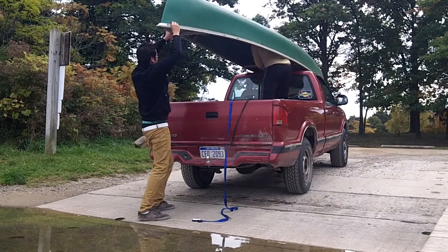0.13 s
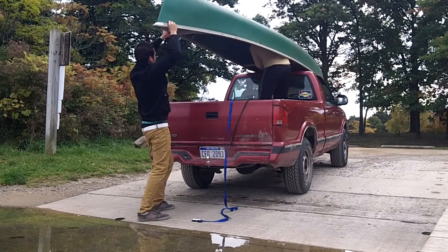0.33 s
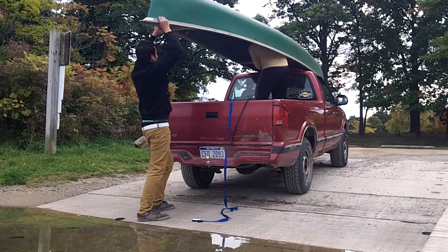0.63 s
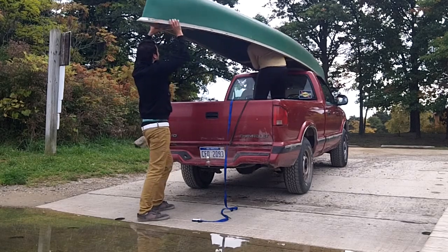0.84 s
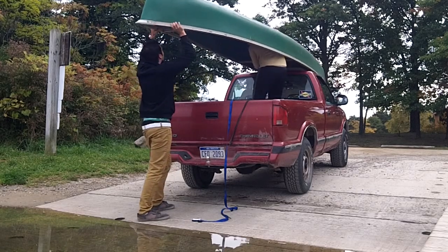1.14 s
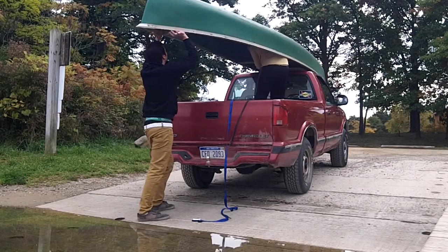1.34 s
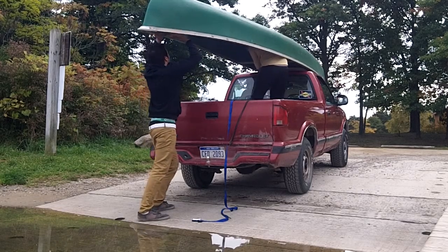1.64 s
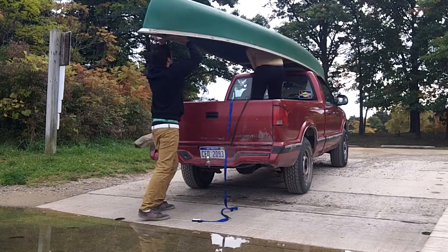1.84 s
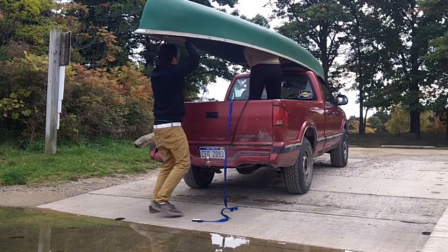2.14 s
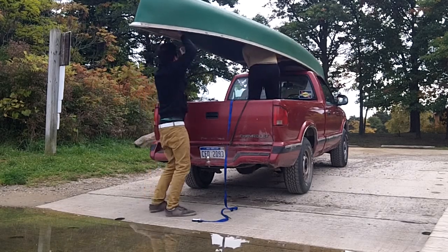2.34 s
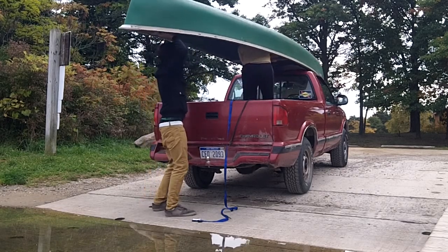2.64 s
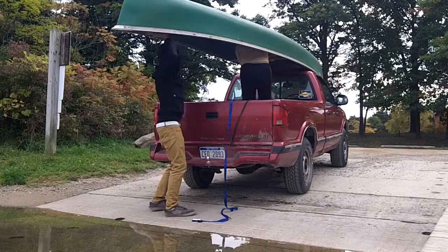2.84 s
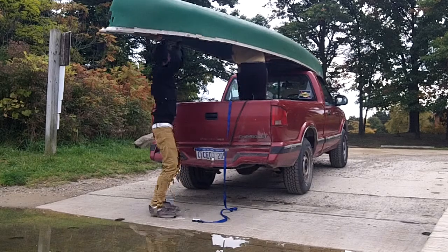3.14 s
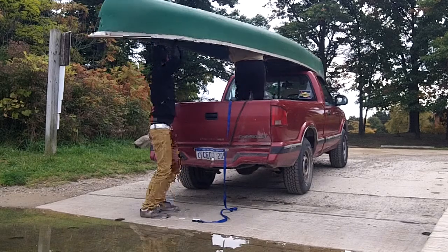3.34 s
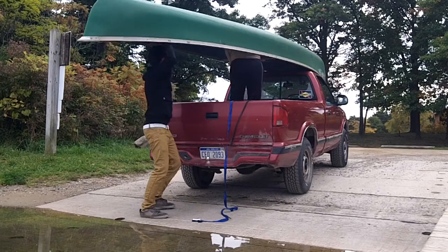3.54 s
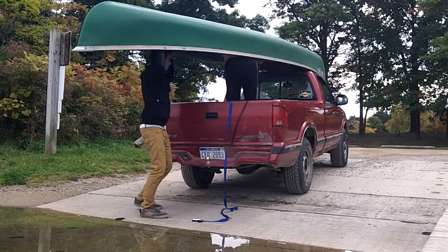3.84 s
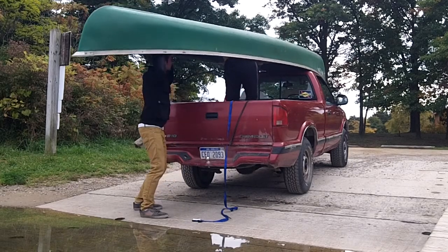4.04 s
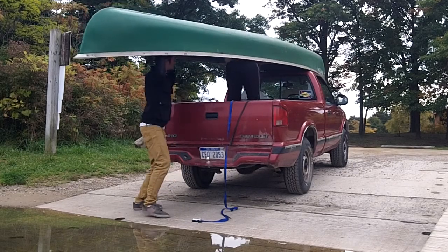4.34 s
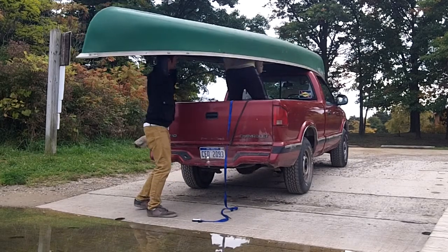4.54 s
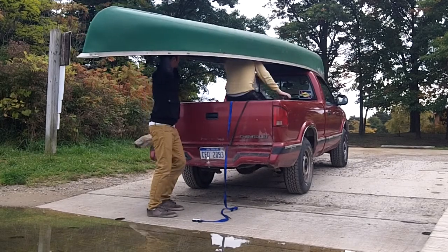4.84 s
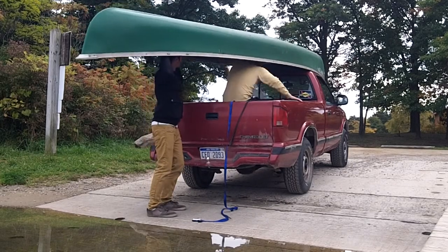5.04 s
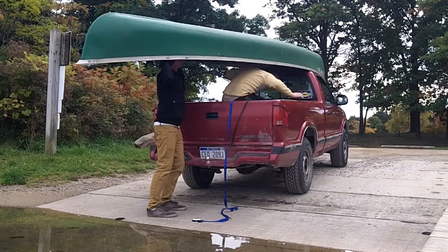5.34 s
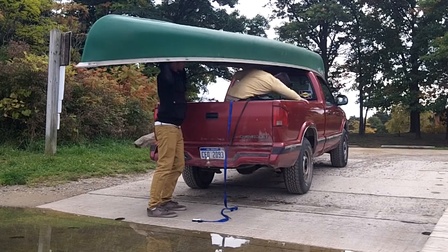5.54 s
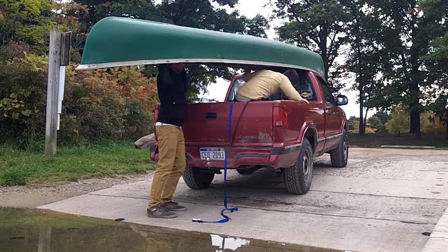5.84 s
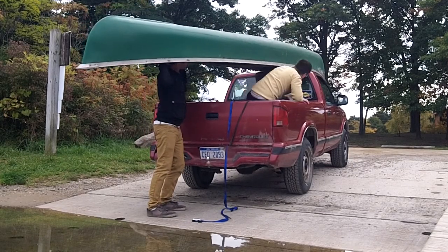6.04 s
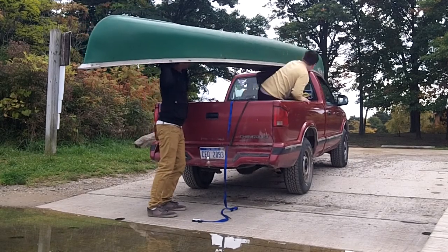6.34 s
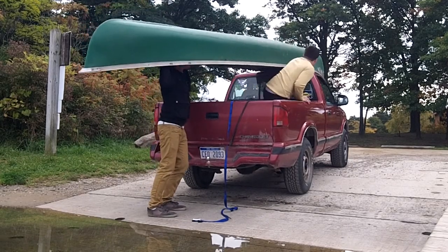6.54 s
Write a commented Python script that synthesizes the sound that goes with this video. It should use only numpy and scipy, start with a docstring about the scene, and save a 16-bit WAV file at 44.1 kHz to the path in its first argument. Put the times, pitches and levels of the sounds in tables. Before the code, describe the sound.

Outdoors, a bird repeats a short nasal squeaky call while a canoe bumps hollowly onto a truck, with soft footfalls and faint distant squawks.

```python
"""Boat launch ringed by trees, one microphone channel: a canoe is slid onto a pickup.
Under it lie a low rumble of chance level, an open-air wash and a fine hiss, all shaped noise.
Far off, hoarse squawks glide on rough harmonics; nearer, a bird repeats a nasal call of partials that frays.
Closest is the work: ringing hull modes, ticks, friction of tiny slips, shoe thuds, gritty scuffs and rustles.
Echoes and a diffuse tail of noise put the birds among the trees; the work has the tail alone."""
import sys
import numpy as np
from scipy import signal
from scipy.fft import rfft, irfft
from scipy.io import wavfile

SR = 44100
rng = np.random.default_rng(int(sys.argv[2]) if len(sys.argv) > 2 else 0)


def put_to_file(sound):
    """Save the sound as 16-bit audio at rate SR, in the file named by the first command-line argument."""
    columns = np.atleast_2d(sound).T  # one column per channel
    safe = np.clip(columns, -1, 1)
    whole_steps = np.round(safe * 32767)
    wavfile.write(sys.argv[1], SR, whole_steps.astype(np.int16))


N = 294706
TIME = np.arange(N) / SR


def from_db(db):
    """Decibels to amplitude gain."""
    return 10 ** (np.asarray(db) / 20)


def rms_one(x):
    """Scale to unit power."""
    return x / np.sqrt(np.mean(x ** 2) + 1e-20)


def in_time(rows, t=TIME):
    """Each column of a curve, read at the times t."""
    s, *columns = np.transpose(rows)
    return [np.interp(t, s, column) for column in columns]


def coloured(x, spectrum):
    """Shape x by a spectrum of (f/Hz, level/dB) points, straight over log frequency; rms 1."""
    hz, db = np.transpose(spectrum)
    bins = np.maximum(np.fft.rfftfreq(N, 1 / SR), 1)
    gain = from_db(np.interp(np.log(bins), np.log(hz), db))
    return rms_one(irfft(rfft(x) * gain, N))


def filtered(x, hz, kind, order=2):
    """Butterworth filter."""
    return signal.sosfilt(signal.butter(order, hz, kind, fs=SR, output="sos"), x)


def noise(count=N):
    """White noise."""
    return rng.standard_normal(count)


def wobble(hz, count=N):
    """Random motion up to a given speed; rms 1."""
    return rms_one(filtered(noise(count), hz, "low"))


def gate(t, length, edge):
    """On from 0 to length, with sloping edges."""
    return np.clip(t / edge, 0, 1) * np.clip((length - t) / edge, 0, 1)


def bell(hz, centre_hz, octaves):
    """Gain of a resonance with steep skirts, 1 at its centre."""
    return 1 / (1 + (np.log2(hz / centre_hz) / octaves) ** 2) ** 2


def add(out, s, sound):
    """Mix a sound in at time s."""
    at = max(round(s * SR), 0)
    out[at:at + len(sound)] += sound[:N - at]


# Spectrum of the open air: [f/Hz, relative level per Hz/dB]
AIR_SPECTRUM = [(12, -45), (20, 3.5), (33, -8), (59, -8.5), (120, -5.5), (244, -12.5), (361, -16),
                (589, -19.5), (734, -19), (1420, -25), (2830, -23), (4180, -26.5), (5090, -23), (5610, -30),
                (7000, -31), (9100, -58), (15400, -120)]
# Spectrum of the hiss: [f/Hz, relative level per Hz/dB]
HISS_SPECTRUM = [(6000, -16), (8000, -8.5), (9500, -2), (11000, -2.5), (13500, -2), (15000, -8),
                 (16000, -4)]
# Chance wander of the low rumble's level, before its gain and faster flutter: [t/s, level/dB]
RUMBLE_WANDER = [(0.1, -55), (0.19, -53), (1.31, -51), (1.48, -58.5), (1.75, -50), (2.33, -56.5),
                 (5.37, -51.5), (5.48, -55), (6.55, -52), (6.6, -54)]
# Level of the treble hiss before its gain: [t/s, level/dB]
HISS_LEVELS = [(0.1, -65.5), (1.35, -65), (1.69, -66.5), (6.6, -66.5)]
AIR_DB = -65   # mean wash level, referred to its 400-1300 Hz band


def background(rumble_gain_db=0.0, hiss_gain_db=-0.1, flutter_db=1.5, sway_db=1.0):
    """Noise in three bands: low rumble with a chance wander, swaying wash of open air and fine hiss."""
    rumble_db, = in_time(RUMBLE_WANDER)
    hiss_db, = in_time(HISS_LEVELS)
    rumble = rms_one(filtered(coloured(noise(), AIR_SPECTRUM), 102.7, "low", order=4))
    rumble *= from_db(rumble_db + rumble_gain_db + flutter_db * wobble(7.5))
    air = filtered(coloured(noise(), AIR_SPECTRUM), [110, 7200], "band", order=4)
    air /= np.std(filtered(air, [400, 1300], "band"))
    air *= from_db(AIR_DB + sway_db * wobble(12))
    hiss = coloured(noise(), HISS_SPECTRUM) * from_db(hiss_db + hiss_gain_db)
    return rumble + air + hiss


# Far-off hoarse squawks: [t/s, length/s, level/dB before the mix, starting pitch f/Hz,
# starting throat f/Hz, throat glide/octaves, throat width/octaves, roughness (relative)]
FAR_SQUAWKS = [(0.124, 0.13, -55, 817, 2590, -0.41, 0.78, 0.82),
               (.49, .11, -54, 846, 3140, -0.33, 0.3, 0.8), (0.576, .16, -60, 818, 3000, -0.23, 1, 0.85),
               (1.281, 0.029, -49, 827, 3350, -0.17, 0.39, 1.23),
               (1.918, 0.11, -64, 825, 3600, -0.074, 0.55, 1.23),
               (4.097, .13, -61, 845, 1720, 0.22, 0.41, 1.23),
               (4.457, 0.085, -47.5, 877, 2010, 0.26, 0.78, 0.83),
               (4.524, .07, -54.5, 970, 2410, 0.039, 0.7, 0.8),
               (4.543, 0.07, -52, 967, 2000, -0.0047, .3, .28),
               (5.25, 0.066, -53, 896, 3230, -0.38, .36, 0.48),
               (5.65, 0.07, -56.5, 817, 3070, -0.44, 0.2, 0.77)]
PITCH_FOLLOWS = .88   # share of the throat's glide in octaves that the pitch makes


def squawks(jitter=0.046, rasp=1.0, flutter_db=1.5, low_db=-11, low_octaves=0.13):
    """Short gliding cries: shaky harmonics under a sliding throat resonance and a weaker fixed low one."""
    out = np.zeros(N)
    for s, length, db, first_hz, first_throat_hz, glide, octaves, rough in FAR_SQUAWKS:
        count = round(length * SR)
        t = np.arange(count) / SR
        throat_hz = first_throat_hz * 2 ** (glide * t / length)
        pitch = first_hz * 2 ** (PITCH_FOLLOWS * glide * t / length)
        shaky_pitch = pitch * (1 + jitter * rough * wobble(250, SR)[:count])
        phase = 2 * np.pi * np.cumsum(shaky_pitch) / SR
        cry = np.zeros(count)
        for k in range(2, 8):
            gain = bell(k * pitch, throat_hz, octaves)
            gain += from_db(low_db) * bell(k * pitch, 1590, low_octaves)
            roughness = 1 + rasp * rough * wobble(350, SR)[:count]
            cry += gain * np.sin(k * phase) * roughness
        cry *= from_db(flutter_db * rough * wobble(83, SR)[:count])
        cry *= gate(t, length, length / 4)
        add(out, s, from_db(db) * rms_one(cry))
    return out


# Pitch before scoop, sag and jitter, one table a call: [t/s, f/Hz]
CALL_PITCH = [
    [(1.335, 814), (1.359, 813.7), (1.409, 848.5), (1.613, 793), (1.619, 810), (1.637, 804), (1.665, 790)],
    [(2.757, 798), (2.767, 789), (2.791, 852.4), (2.917, 802.2), (3.031, 790.7), (3.073, 822), (3.1, 767)],
    [(3.59, 809), (3.598, 774), (3.638, 853.6), (3.72, 819.9), (3.832, 811.4), (3.958, 760), (3.965, 770)],
    [(4.56, 803), (4.572, 829), (4.596, 829), (4.772, 790.4), (4.856, 781.6), (4.882, 762), (4.895, 738)],
    [(5.892, 742), (5.906, 802), (5.93, 801), (6.086, 786.6), (6.196, 753), (6.202, 785), (6.222, 718)],
]
# Strong fourth partial before fray, throb and trim, one table a call: [t/s, level/dB]
CALL_LEVEL = [
    [(1.335, -62), (1.343, -63), (1.355, -57), (1.403, -37), (1.449, -39), (1.463, -53), (1.527, -44.5),
     (1.629, -41), (1.665, -43)],
    [(2.757, -62), (2.765, -52), (2.789, -42.5), (2.823, -41), (2.883, -51), (2.897, -38), (3.015, -45),
     (3.091, -42), (3.1, -39)],
    [(3.59, -62), (3.594, -51), (3.622, -45), (3.684, -42), (3.71, -57), (3.756, -38.5), (3.818, -44),
     (3.832, -39.5), (3.965, -49)],
    [(4.56, -53), (4.574, -50.5), (4.68, -40.5), (4.698, -55), (4.708, -43.5), (4.774, -47), (4.842, -51.5),
     (4.858, -41.5), (4.895, -48)],
    [(5.892, -54), (5.904, -48), (5.944, -38.5), (5.998, -53.5), (6.036, -40.5), (6.118, -48), (6.126, -62),
     (6.214, -41), (6.222, -49)],
]
# Voice of each call: [side partials' level re the fourth's scale/dB, extra for the upper ones/dB,
# fade-in/s, scoop as share of pitch, fray at the start (0-1), fray at the end (0-1)]
CALL_VOICE = [(-49.5, -3, .003, 0.0598, 0.75, 0.54), (-49, -3.5, .004, .13, 0.63, 0.5),
              (-51.5, -4.5, .003, 0.0813, 0.97, .67), (-50.5, -10.5, 0.011, 0.0058, 0.34, 0.5),
              (-53.5, -7.5, .005, 0.047, 0.2, 0.35)]
# Partials around the fourth: [multiple of pitch, added level at the start/dB, at the end of a call/dB]
SIDE_PARTIALS = [(2, -20, -9.5), (3, -3.5, -4.5), (5, -19, -6.5), (6, -9, -20), (7, -20, -21.5),
                 (8, -20, -11), (9, -42, -34)]
# Spectrum of the rasp: [f/Hz, relative level/dB]
RASP_SPECTRUM = [(1000, -25), (1600, -6), (2000, -27), (2500, 0.5), (3200, -14), (3800, -5), (4700, -11.5),
                 (6300, -39.5), (8000, -37)]
NASAL_HZ, NASAL_OCTAVES, NASAL_DB = 3999, 0.032, 8   # lifts the fifth partial as the pitch passes 800 Hz
JITTER, FRAY_RASP = .0024, .7   # steady jitter as share of pitch; rasp gain added at full fray
END_DB, FRAY_UPPER_DB = -2, 0.5   # weakening at the end; lift of the upper partials at full fray
FADE_S = 0.017   # cut-off of a call


def bird(voice_db=0.9, fray_jitter=0.034, rasp_db=-32, onset_s=0.033, fray_s=0.062,
         scoop_s=0.01185, drop=0.031, flutter_db=3.0, throb_db=1.27):
    """A reedy tone, strong in its fourth partial, scoops up as it starts, sags and breaks up as it ends."""
    out = np.zeros(N)
    rasp = coloured(noise(), RASP_SPECTRUM)
    shake = wobble(200)
    for course, level, voice in zip(CALL_PITCH, CALL_LEVEL, CALL_VOICE):
        side_db, upper_db, fade_s, scoop, start_fray, end_fray = voice
        on = (TIME > course[0][0] - .002) & (TIME < course[-1][0] + .008)
        t = TIME[on]
        since, until = t - t[0], t[-1] - t
        pitch, = in_time(course, t)
        fourth_db, = in_time(level, t)

        ending = np.exp(-(until / fray_s) ** 2)
        starting = np.exp(-(since / onset_s) ** 2)
        fray = np.clip(start_fray * starting + end_fray * ending, 0, 1)
        # low pressure lowers the pitch at both ends
        slack = scoop * np.exp(-since / scoop_s) + drop * np.exp(-until / scoop_s)
        jitter = (JITTER + fray_jitter * fray) * shake[on]
        phase = 2 * np.pi * np.cumsum(pitch * (1 - slack + jitter)) / SR

        throb = throb_db * wobble(50, SR)[:len(t)]
        tone = from_db(fourth_db + throb) * np.sin(4 * phase)
        for multiple, first_db, last_db in SIDE_PARTIALS:
            k = round(multiple)
            db = side_db + np.linspace(first_db, last_db, len(t))
            db += (upper_db + FRAY_UPPER_DB * fray) * (k > 4)
            db += NASAL_DB * bell(k * pitch, NASAL_HZ, NASAL_OCTAVES)
            db += flutter_db * wobble(26, SR)[:len(t)]
            tone += from_db(db) * np.sin(k * phase)

        hoarse = from_db(fourth_db) * (from_db(rasp_db) + FRAY_RASP * fray) * rasp[on]
        fades = np.clip(np.minimum(since / fade_s, until / FADE_S), 0, 1)
        cry = np.sqrt(2) * tone * (1 - fray / 2) + hoarse
        out[on] += cry * from_db(END_DB * ending) * fades
    return from_db(voice_db) * out


# Delays of the ground, the truck and the tree line: [t/s, level/dB]
SITE_ECHOES = [(.021, -7), (.058, -10), (0.094, -26.5), (.135, -45), (0.272, -23)]


def echoes(x):
    """Single echoes beat against a gliding tone and make it throb."""
    return sum(from_db(db) * np.interp(TIME - s, TIME, x, left=0) for s, db in SITE_ECHOES)


def trees(x, wet_db, t60, build_s=0.028):
    """Trunks and leaves scatter a diffuse tail that builds up and dies away."""
    t = np.arange(SR) / SR
    tail = noise(SR) * from_db(-60 * t / t60) * (1 - np.exp(-t / build_s))
    return from_db(wet_db) * signal.fftconvolve(x, tail / np.linalg.norm(tail))[:N]


# Light rustles close by: [t/s, length/s, level/dB]
CLOTH_RUSTLES = [(1.03, 0.042, -68), (1.227, 0.049, -60), (6.51, 0.03, -57), (6.544, 0.047, -62)]


def rustles(grain_db=4):
    """Thin brushes of cloth and strap: band noise with a grainy level."""
    grains = rms_one(filtered(noise() * from_db(grain_db * wobble(200)), [3000, 6300], "band"))
    return grains * sum(from_db(db) * gate(TIME - s, length, 0.0017) for s, length, db in CLOTH_RUSTLES)


# Footfalls: [t/s, thud level/dB, thud f/Hz, scuff level/dB, scuff length/s]
FOOTFALLS = [(2.239, -63, 250, -59.5, 0.039), (2.391, -33.5, 284, -47, 0.039),
             (3.035, -38, 370, -59, 0.056), (3.371, -34.5, 396, -52.5, 0.056),
             (4.615, -38, 390, -57, 0.023), (5.038, -31, 377, -52.5, 0.032), (5.722, -49, 303, -53, 0.026)]
# Spectrum of grit under a sole: [f/Hz, relative level/dB]
GRIT_SPECTRUM = [(200, -28), (600, -19.5), (1100, -6), (1700, 0.5), (2300, -7), (3100, -1.5), (4200, -7),
                 (6000, -11), (7300, -18.5), (9500, -36)]


def shoes(thud_t60=0.011, body_t60=0.14, body_db=-8, body_octaves=0.57, grain_db=-2.5):
    """A sole lands with a dead decaying tone and band noise, and drags briefly over grit."""
    out, t = np.zeros(N), np.arange(SR // 4) / SR
    grit = coloured(noise() * from_db(grain_db * wobble(420)), GRIT_SPECTRUM)
    for s, thud_db, thud_hz, scuff_db, length in FOOTFALLS:
        thud = np.sin(2 * np.pi * thud_hz * t) * from_db(-60 * t / thud_t60)
        band = thud_hz * 2 ** (body_octaves * np.array([-1, 1]))
        body = rms_one(filtered(noise(len(t)), band, "band"))
        body *= from_db(body_db - 60 * t / body_t60)
        add(out, s, from_db(thud_db) * (thud + body))
        out += from_db(scuff_db) * grit * gate(TIME - s, length, 0.0027)
    return out


# Hull dragging on the truck: [t/s, length/s, level/dB]
HULL_DRAGS = [(0.547, 0.075, -58.5), (0.834, 0.23, -55), (1.018, 0.11, -48.5), (1.054, 0.31, -56.5),
              (3.008, 0.24, -57.5), (3.376, 0.53, -56.5), (4.265, 0.07, -57.5), (5.708, 0.12, -51),
              (6.25, 0.25, -58)]
# Spectrum of that friction: [f/Hz, relative level/dB]
FRICTION_SPECTRUM = [(120, -11), (250, 12), (450, 5.5), (700, 0.5), (1200, -3), (1800, -2), (2600, -10.5),
                     (4500, -10), (8000, -66)]


def drags(slips_per_s=1500):
    """Dense tiny random slips where the hull rubs along."""
    slips = coloured(noise() * (rng.random(N) < slips_per_s / SR), FRICTION_SPECTRUM)
    return slips * sum(from_db(db) * gate(TIME - s, length, length / 3) for s, length, db in HULL_DRAGS)


def nudges(count=6, from_s=0.9, level_db=-54, spread_db=3, centre_hz=200, ring_share=0.75, tick_db=-67):
    """Faint touches on the hull at random moments, as rows like those of the bumps."""
    rows = []
    for when, force, place in rng.random((count, 3)):
        s = from_s + when * (N / SR - from_s)
        db = level_db + spread_db * (2 * force - 1)
        hz = centre_hz * 2 ** (place - .5)
        rows.append((s, db, hz, ring_share, tick_db))
    return rows


# Modes of the canoe hull: [f/Hz, relative level/dB, t60/s before a bump's ring share]
HULL_MODES = [(90, 10.5, 0.23), (145.4, -1.5, 0.4), (163.3, 2.5, 0.7), (190.9, 4.5, 0.57), (209.5, -5.5, 1),
              (231, -1, 0.51), (263, -2, 0.45), (306.7, -5, 0.85), (334, 1, 0.42), (390.5, 1.5, 0.44),
              (398.7, -8.5, 0.59), (465, 4, 0.23), (484, -15.5, 0.49), (518, -3, 0.51), (564, -9, 0.9),
              (655, 3, 0.56), (750, 9, 0.07), (935, 24.5, 0.087)]
# Clear bumps: [t/s, ringing level/dB before the contact filter, centre of the modes struck f/Hz,
# share of the ring time, contact tick level/dB]
HULL_BUMPS = [(.631, -48, 124, 3.3, -61), (0.96, -38, 314, 0.5, -68), (1.068, -27.5, 413, 0.54, -54),
              (1.083, -29.5, 407, 0.9, -60), (1.098, -31, 282, 0.74, -57), (1.143, -35, 268, 1.6, -66),
              (1.572, -42.5, 126, 0.59, -72), (1.737, -42.5, 190, 1.16, -51.5), (1.89, -44, 267, 0.96, -62),
              (1.901, -40, 93, 0.9, -75), (2.065, -43, 212, 0.42, -57.5), (2.628, -49.5, 194, 1.15, -68),
              (3.068, -44, 131, 0.9, -70), (3.132, -48, 286, 1.4, -74), (3.305, -40.5, 120, 0.57, -60),
              (3.605, -41.5, 259, 0.85, -63), (3.772, -49, 157, 0.38, -52), (4.181, -44.5, 149, 0.57, -77),
              (4.28, -43, 202, 0.44, -67), (4.315, -44, 236, 0.58, -64), (5.732, -35.5, 234, 0.25, -53.5),
              (5.764, -45, 189, 1.2, -61), (6.3, -45.5, 255, 1.87, -56)]
SPREAD_OCTAVES = 0.61   # reach of a bump around its centre


def hull(tick_t60=0.12, contact_hz=1100, contact_s=0.00075):
    """Each bump rings the decaying modes near its own centre, with a small hard tick at the contact."""
    out, t = np.zeros(N), np.arange(SR // 2) / SR
    hz, mode_db, t60 = np.transpose(HULL_MODES)
    for s, db, centre_hz, ring_share, tick_db in HULL_BUMPS + nudges():
        strength = from_db(mode_db + rng.normal(0, 2.9, len(hz)))
        strength *= bell(hz, centre_hz, SPREAD_OCTAVES)
        strength *= rng.choice([-1, 1], len(hz)) / np.linalg.norm(strength)
        decay = from_db(-60 * np.outer(1 / (t60 * ring_share), t))
        rings = np.sin(2 * np.pi * np.outer(hz, t)) * decay
        thump = strength @ rings * (1 - np.exp(-t / contact_s))
        add(out, s, from_db(db) * filtered(thump, contact_hz, "low"))
        tick = rms_one(filtered(noise(len(t)), [600, 1800], "band", order=1))
        add(out, s, from_db(tick_db) * tick * from_db(-60 * t / tick_t60))
    return out


def scene(leaves_hz=2750):
    """Open air, birds among the trees and the work on the ramp, on one channel."""
    far, cries = squawks(), bird()
    work = hull() + drags() + shoes() + rustles()
    returned = filtered(cries, leaves_hz, "high", order=4)   # the surroundings return mostly treble
    far_birds = from_db(0.5) * (far + echoes(far)) + trees(far, wet_db=-2.5, t60=0.77)
    near_bird = cries + echoes(returned) + trees(returned, wet_db=-6, t60=0.91)
    ramp = work + trees(work, wet_db=-13, t60=0.53)
    return (background() + far_birds + near_bird + ramp)[None]


def record(dry):
    """The recorder has a narrow dip in the treble and a steep top cut."""
    b, a = signal.iirnotch(7900, 5, fs=SR)
    dipped = signal.lfilter(b, a, dry)
    top_cut = signal.ellip(10, .1, 80, 15300, fs=SR, output="sos")   # order, ripple/dB, stop/dB, f/Hz
    return signal.sosfilt(top_cut, dipped)


dry = scene()
out = record(dry)
put_to_file(out)
```